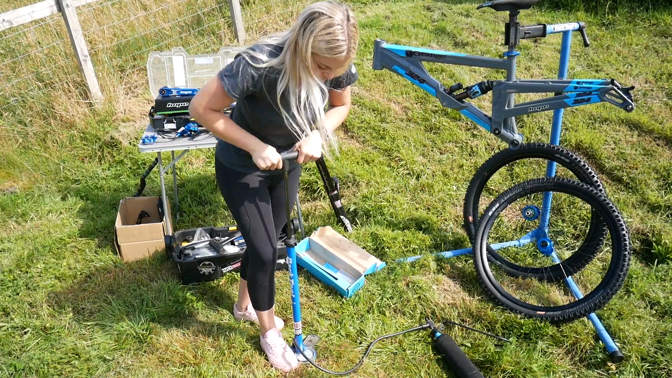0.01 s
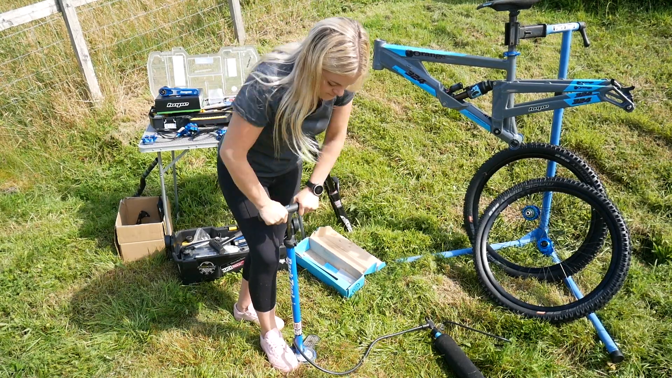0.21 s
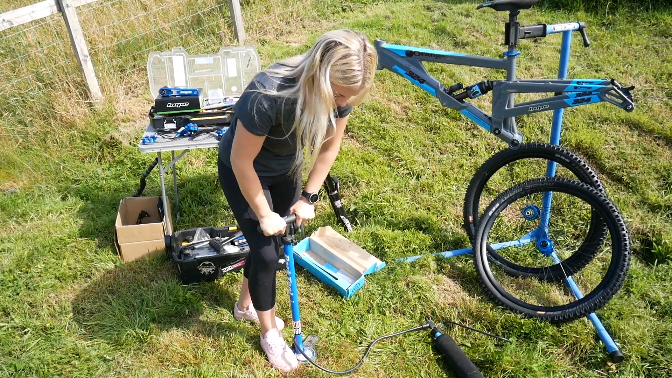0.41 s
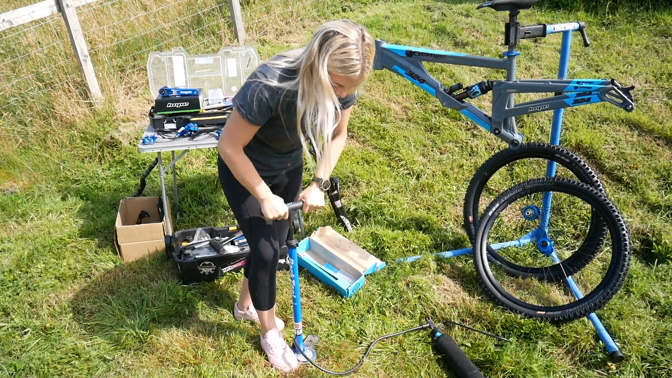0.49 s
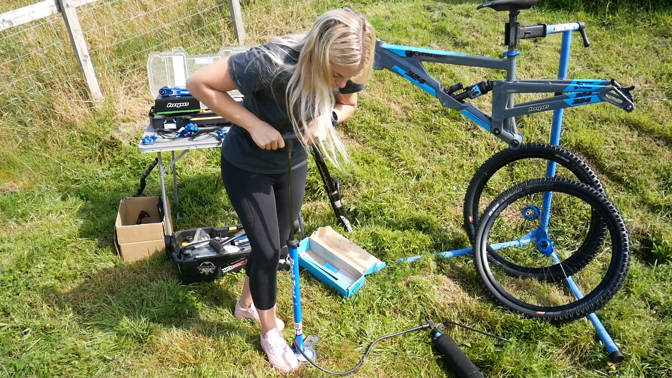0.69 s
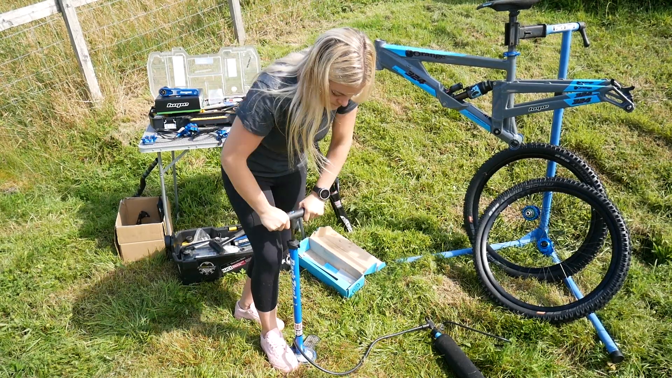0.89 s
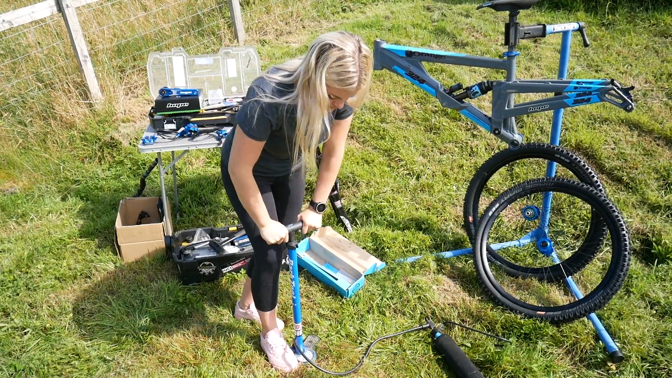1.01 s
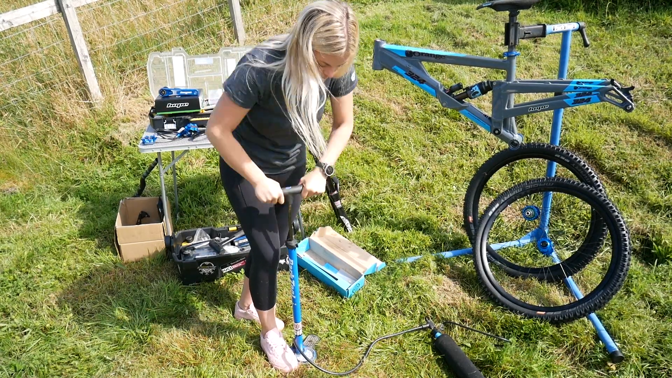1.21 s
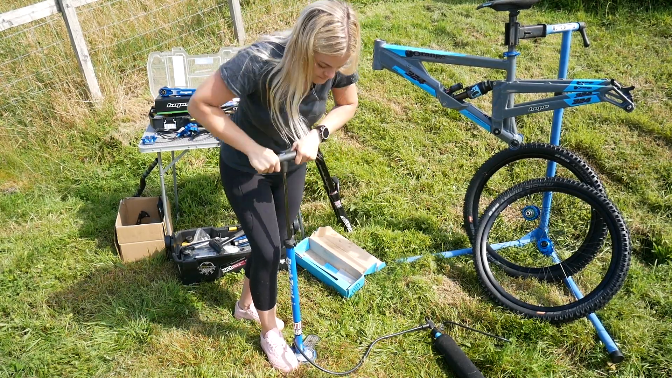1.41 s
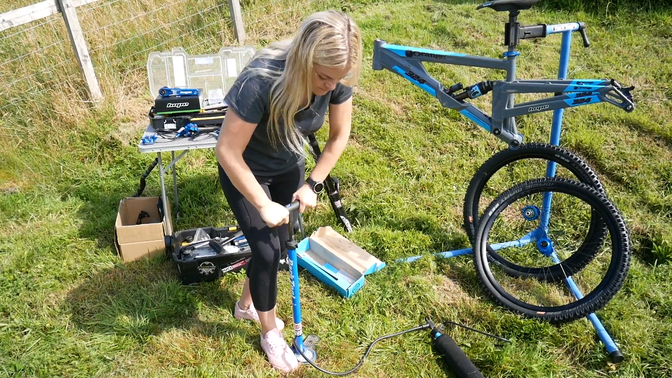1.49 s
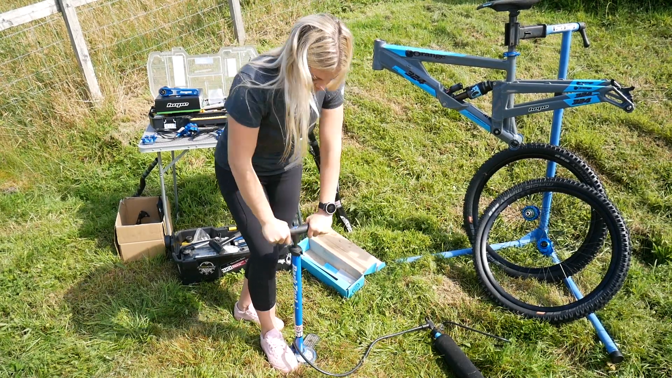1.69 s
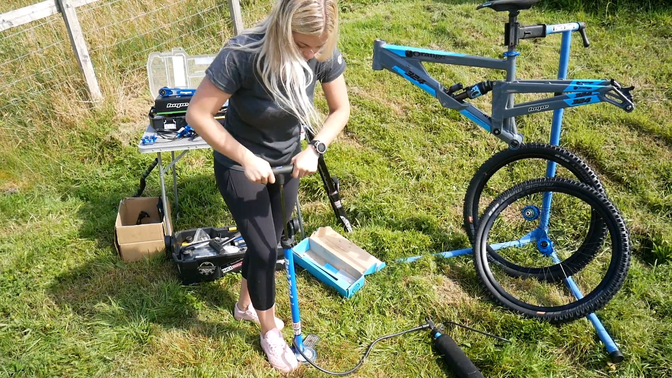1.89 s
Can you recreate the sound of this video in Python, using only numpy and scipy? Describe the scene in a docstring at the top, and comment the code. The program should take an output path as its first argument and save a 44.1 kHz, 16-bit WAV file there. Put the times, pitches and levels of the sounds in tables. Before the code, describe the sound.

A bicycle floor pump on grass, heard from a few steps away. A soft intake rush opens; pushes hiss from about 0.12, 0.76 and 1.4 seconds, ending in rough, falling-then-shrill squeaks near 0.25-0.38, 0.89-0.95 and 1.53-1.69. Dull valve pops come at 0.47 and 1.15, airy lifts around 0.6, 1.28 and 1.95. Faint open air, a low hum and very little echo.

```python
"""A soft rush of air into a barrel, then three quick pushes of a bicycle floor pump on a lawn, a few steps away.
Each push hisses (shaped noise) and its seal squeaks: two beating modes with locked overtones; pitch drops, chatters.
Bleeding air rings the hose; lifts draw air (noise swells, barrel resonances); two upward turns pop the valve.
A weak fence echo and short tail follow. Open air (wide noise) and a faint wavering hum (sine) lie beneath."""
import sys
import numpy as np
from scipy import signal
from scipy.fft import rfft, irfft, next_fast_len
from scipy.io import wavfile
from scipy.ndimage import uniform_filter1d, map_coordinates

SR = 44100
rng = np.random.default_rng(int(sys.argv[2]) if len(sys.argv) > 2 else 0)


def master_out(mix):
    """Clip the mix to full scale and print it as 16-bit PCM to the path in sys.argv[1]."""
    frames = np.transpose(np.atleast_2d(mix))
    ceiling = np.clip(frames, -1, 1)
    pcm = np.round(ceiling * 32767).astype(np.int16)
    wavfile.write(sys.argv[1], SR, pcm)


N = 85995

# Squeak track per push: t/s, pitch f/Hz, level/dB, octave level/dB, second mode re first/dB, its offset above pitch f/Hz
SQUEAKS = [
    [(.2435, 2618, -18.5, -63.5, -42, 800), (.246, 2066, -17.5, -41.5, -35, 816),
     (.252, 1946, -19, -24.5, -16, 804), (.260, 1890, -20.5, -38.5, -34, 500),
     (.268, 1990, -19, -30.5, -11.5, 433), (.277, 1887, -23.5, -36, -3, 450),
     (.284, 2077, -11.5, -56, -26, 450), (.292, 2153, -14, -37.5, -45, 450),
     (.318, 2076, -14.5, -40, -53, 450), (.351, 2135, -15, -47, -70.5, 427),
     (.364, 2065, -20, -44, -51.5, 450), (.372, 1915, -24, -54.5, -46, 448),
     (.383, 1777, -42.5, -66.5, -33, 452)],
    [(.889, 2492, -34, -57, -22.5, 500), (.893, 2034, -18.5, -58, -20, 500),
     (.900, 1852, -22.5, -39.5, -9, 484), (.919, 1998, -21.5, -36.5, -11, 426),
     (.924, 1835, -28, -42, -6.5, 331), (.928, 1824, -26, -30.5, -15, 330),
     (.936, 1882, -21.5, -34.5, 12, 290), (.940, 1894, -41, -45, -16, 302),
     (.948, 1900, -45, -51, -17, 300)],
    [(1.527, 2497, -27, -53, -35, 700), (1.532, 2212, -19, -45, -34, 693),
     (1.538, 1950, -18, -40.5, -21.5, 715), (1.546, 1922, -25, -39, -6, 854),
     (1.548, 1810, -29.5, -37.5, -7, 370), (1.562, 1770, -26, -38.5, 6, 388),
     (1.570, 2065, -20.5, -40.5, -21.5, 395), (1.581, 1991, -21.5, -34.5, -16, 404),
     (1.610, 1953, -21.5, -39, -56, 406), (1.628, 1992, -20, -41, -54, 408),
     (1.645, 2013, -22, -41.5, -67, 410), (1.662, 1947, -21, -46.5, -53, 410),
     (1.675, 1820, -43.5, -49.5, -29.5, 400), (1.688, 1816, -39, -65, -28, 400)],
]
# Overtones above the octave: multiple of pitch, level/dB before growth and chatter loss
OVERTONES = [(3, -49.5), (4, -44), (5, -52.5), (6, -53.5), (7, -62.5)]
# Every other slip a little stronger: multiple of pitch, level re octave/dB
SUBTONES = [(.5, -23.5), (1.5, -15), (2.5, -18), (3.5, -25.5), (5.5, -36.5)]
# Rubbing noise colour: f/Hz, relative level/dB
RASP = [(40, -45), (200, -16.5), (450, -12), (1200, -23), (1600, -19), (1900, -24), (2400, 2), (2800, -10),
        (3500, 6), (4800, -7), (5700, -12.5), (7800, 1.5), (10000, -22), (12000, -24.5), (15000, -30)]
# Squeak stereo balance: f/Hz, L-R level/dB
SQUEAK_BALANCE = [(1800, 1), (2000, .5), (2150, -.4), (4200, -.5), (6200, 0), (8300, 3), (10000, -2),
                  (14000, -7)]
# Squeak stereo phase: f/Hz, left lead/rad
SQUEAK_PHASE = [(2000, 0), (5200, .1), (6200, -1), (8300, -1.3), (12500, -.6)]
JITTER, CHATTER_JITTER, JITTER_RATE_HZ = .0025, .018, 700  # pitch scatter as fraction: steady, added by chatter
SLIP_SCATTER_RAD, SLIP_SCATTER_RATE_HZ = 0.11, 600
OCTAVE_BEAT_RAD = .45  # beating passed to the overtones in full chatter
SHIMMER_DB, OVERTONE_FLICKER_DB = .35, 3.5
LOCKED_DB, OVERTONE_GROWTH = -18.5, .3  # squeak level of zero overtone offset; dB per dB above it (1 below)
CHATTER_LOSS_DB = 4  # per multiple of pitch in full chatter
RASP_DB, RASP_CHATTER = -10, 1.0  # re octave; growth with chatter

# Pushes: start t/s, end t/s, hiss level/dB
PUSHES = [(0.124, 0.305, -44), (0.76, 0.923, -43.5), (1.402, 1.573, -44.5)]
# Valve hiss colour: f/Hz, relative level/dB
HISS = [(100, -23.5), (450, -7.5), (1000, -8), (1500, -1), (2300, -0.5), (3300, 1.5), (4800, -2.5),
        (6400, -0.5), (7500, 6), (8600, -1.5), (10500, -6), (11700, -7), (13000, -13), (15000, -20)]
# Likeness of left and right, shared by the pump noises: f/Hz, correlation/1
HISS_ALIKE = [(500, 1), (1500, 0.83), (3000, 1), (5500, .6), (7500, 0), (14000, 0)]
# Pump noise balance: f/Hz, L-R level/dB
HISS_BALANCE = [(1300, 2.5), (4400, -2), (8500, 1.5), (11000, -5), (14500, -10.5)]
# Hollow rush as a push starts: f/Hz, relative level/dB
GULP = [(150, -22), (600, -5), (850, -6.5), (1050, 1), (1500, -5), (2200, -4), (3300, -12), (5000, -27.5),
        (6500, -29), (7200, 1), (8000, -2), (12000, -18.5)]
# Top of the jet: f/Hz, relative level/dB
FIZZ = [(3000, -42), (7000, -11), (8400, -0.5), (10200, 0.5), (11700, 2), (13000, -7.5), (15000, -12)]
PUSH_ATTACK_S, PUSH_FALL_DB_PER_S = 0.07, 174.5
GULP_DELAY_S, GULP_SPREAD_S, GULP_DB = .058, 0.021, -2  # re hiss
FIZZ_DELAY_S, FIZZ_DB = 0.032, -7.5  # builds later, with the pressure; re hiss
HISS_PATCHY_DB, INTAKE_PATCHY_DB = 3.5, 4

# Air singing on in the hose: start t/s, end t/s, level/dB
BLEEDS = [(.34, .39, -57), (.935, 1.055, -54), (1.64, 1.69, -54)]
# Hose resonances: f/Hz, width/Hz, relative level/dB
HOSE = [(2186, 63, -4), (2666, 30, 2), (3220, 26, 7), (3790, 120, -7), (4385, 45, 2), (7200, 280, -6.5),
        (7900, 250, -17.5), (10240, 600, -13.5), (11290, 150, -11)]
BLEED_ATTACK_S, BLEED_FALL_DB_PER_S, HOSE_TOP_HZ = .02, 314, 11700

# Lifts: fastest moment t/s, spread/s, level/dB
LIFTS = [(0.023, 0.048, -52), (0.594, 0.075, -53), (1.282, 0.062, -53.5), (1.95, 0.12, -56.5)]
# Drawn air colour: f/Hz, relative level/dB
INTAKE = [(200, -34.5), (900, -7), (1600, -6.5), (2200, 0), (2900, -5), (4000, -10.5), (6500, -10),
          (7300, -9.5), (9000, -18.5), (12000, -20.5), (15000, -35.5)]
# Barrel resonances as air is drawn: f/Hz, width/Hz, relative level/dB
BARREL = [(1270, 100, -13), (2084, 89, -1.5), (2518, 78, 0.5)]
# Rod scuffs at the top turn: t/s, spread/s, level/dB
TOP_KNOCKS = [(.68, .008, -61), (1.793, 0.013, -59.5)]
BARREL_DB = 4  # re drawn air

# Valve pops as the handle turns upward: t/s, thump level/dB, tick level/dB (both before decay)
POPS = [(0.465, -28.5, -50.5), (1.148, -27.5, -46.5)]
# Tick colour: f/Hz, relative level/dB
TICK = [(40, -37), (300, 7), (1500, -18), (2800, -2), (3500, 9.5), (4300, -32.5), (12000, -37)]
POP_HZ, POP_ATTACK_S, POP_T60_S, TICK_T60_S = 327, 0.0059, 0.055, 0.066

# Colour of scattered sound, treble strongest: f/Hz, gain/dB
YARD_COLOUR = [(500, 2), (2200, 5), (3200, 10), (8000, 13), (14000, 10)]
ECHO_S, ECHO_SPREAD_S, ECHO_DB = 0.035, 0.015, -31  # level before YARD_COLOUR
YARD_T60_S, YARD_DB = .2, -31  # level before YARD_COLOUR

# Open air colour: f/Hz, relative level/dB
AIR = [(25, -35), (45, -25), (70, -16.5), (120, -5.5), (200, -1), (380, 0), (600, -6.5), (1000, -14),
       (1400, -16.5), (1950, -19.5), (2500, -20), (4400, -24), (5800, -32.5), (7400, -38), (9000, -32),
       (12000, -37), (15000, -38)]
# Likeness of left and right in the air: f/Hz, correlation/1
AIR_ALIKE = [(60, -0.2), (300, -0.72), (700, -0.7), (1500, -0.6), (3000, 1), (7000, 0.5), (14000, 0.4)]
# Air balance: f/Hz, L-R level/dB
AIR_BALANCE = [(100, -1), (700, -1.1), (2000, 0.5), (8000, 1), (14000, 0)]
AIR_DB = -51.5
HUM_HZ, HUM_DB, HUM_WAVER_DB = 227.2, -62, -0.5
TOP_HZ = 15350


def squeak(rows):
    """Stick-slip seal: a second mode beats with and roughens the first until slipping locks and turns shrill."""
    t = clock()
    s, *cols = np.transpose(rows)
    hz, db, octave_db, second_db, above_hz = [np.interp(t, s, c) for c in cols]
    fade_in = np.clip((t - s[0]) / 0.0026, 0, 1)
    fade_out = np.clip((s[-1] - t) / 0.0022 + 1, 0, 1)
    gate = fade_in * fade_out

    second = amp(second_db)
    chatter = np.sqrt(np.minimum(second, 1))
    jitter = (JITTER + CHATTER_JITTER * chatter) * wobble(JITTER_RATE_HZ)
    phase = 2 * np.pi * np.cumsum(hz * (1 + jitter)) / SR
    beat = 2 * np.pi * np.cumsum(above_hz * (1 + 0.15 * wobble(250))) / SR
    modes = (np.cos(phase) + second * np.cos(phase + beat)) / np.sqrt(1 + second ** 2)

    slip = phase + SLIP_SCATTER_RAD * wobble(SLIP_SCATTER_RATE_HZ)
    beat_shift = OCTAVE_BEAT_RAD * chatter * np.sin(beat)

    def partial(k, level_db):
        """Flickering multiple k of the slip phase."""
        return amp(level_db + OVERTONE_FLICKER_DB * wobble(130)) * np.cos(k * slip + beat_shift)

    def subtone(k, level_db):
        """Flickering half-multiple k of the pitch phase."""
        return amp(level_db + OVERTONE_FLICKER_DB * wobble(90)) * np.cos(k * phase + .5 * wobble(200))

    shrill_db = np.minimum(db - LOCKED_DB, OVERTONE_GROWTH * (db - LOCKED_DB))
    upper = partial(2.001, octave_db)
    for k, level_db in OVERTONES:
        upper = upper + partial(k, level_db + shrill_db - CHATTER_LOSS_DB * k * chatter)
    halves = sum(subtone(k, level_db) for k, level_db in SUBTONES)

    shimmering = amp(db + SHIMMER_DB * wobble(150)) * modes
    tone = np.sqrt(2) * (shimmering + upper + amp(octave_db) * halves)
    rasp_level = amp(octave_db + RASP_DB) * (1 + RASP_CHATTER * chatter)
    rasp = rasp_level * rush(RASP, HISS_ALIKE, HISS_BALANCE)
    return panned(gate * tone, SQUEAK_BALANCE, SQUEAK_PHASE) + gate * rasp


def valve_hiss():
    """Air forced through the valve on the way down: hollow at first, then brighter."""
    flow = held(PUSHES, PUSH_ATTACK_S, PUSH_FALL_DB_PER_S) * amp(0.68 * wobble(46))
    gulps = swells([(start + GULP_DELAY_S, GULP_SPREAD_S, db + GULP_DB) for start, _, db in PUSHES])
    fizz_rows = [(start + FIZZ_DELAY_S, end, db + FIZZ_DB) for start, end, db in PUSHES]
    fizz = held(fizz_rows, PUSH_ATTACK_S, 2 * PUSH_FALL_DB_PER_S)
    out = np.zeros((2, N))
    for level, colour in [(flow, HISS), (gulps, GULP), (fizz, FIZZ)]:
        out += level * patchy(rush(colour, HISS_ALIKE, HISS_BALANCE), HISS_PATCHY_DB)
    return out


def hose():
    """The last of the air rings the hose's resonances."""
    colour = lambda hz: resonances(HOSE)(hz) / (1 + (hz / HOSE_TOP_HZ) ** 20)
    return held(BLEEDS, BLEED_ATTACK_S, BLEED_FALL_DB_PER_S) * rush(colour, HISS_ALIKE, HISS_BALANCE)


def intake():
    """The rising piston rubs along the barrel, which sings when the lift is fastest; the rod scuffs at the top."""
    draw = swells(LIFTS) * patchy(rush(INTAKE, HISS_ALIKE, HISS_BALANCE), INTAKE_PATCHY_DB)
    sing_level = swells([(s, spread * 0.32, db + BARREL_DB) for s, spread, db in LIFTS])
    sing = sing_level * rush(resonances(BARREL), HISS_ALIKE, HISS_BALANCE)
    scuffs = swells(TOP_KNOCKS) * rush(HISS, HISS_ALIKE, HISS_BALANCE)
    return (draw + sing) * amp(0.83 * wobble(70)) + scuffs


def valve_pops():
    """The check valve ticks and the air in the barrel rings briefly."""
    out = np.zeros((2, N))
    for s, thump_db, tick_db in POPS:
        t = np.maximum(clock() - s, 0)
        attack = 1 - np.exp(-(t / POP_ATTACK_S) ** 2)
        out += amp(thump_db - 60 * t / POP_T60_S) * attack * np.sin(2 * np.pi * POP_HZ * t)
        tick_level = (t > 0) * amp(tick_db - 60 * t / TICK_T60_S)
        out += tick_level * rush(TICK, HISS_ALIKE, HISS_BALANCE)
    return out


def yard(x):
    """Convolution with noise: a weak scattered fence echo and a short tail from things on the lawn."""
    t = np.arange(SR // 3) / SR
    echo = np.exp(-.5 * ((t - ECHO_S) / ECHO_SPREAD_S) ** 2)
    decay = amp(-60 * t / YARD_T60_S)
    tail = 0
    for db, shape in [(ECHO_DB, echo), (YARD_DB, decay)]:
        # common noise plus half as much private to each channel
        noise = rng.standard_normal(len(t)) + .5 * rng.standard_normal((2, len(t)))
        tail = tail + amp(db) * shape / np.linalg.norm(shape) * noise
    scattered = signal.fftconvolve(x, tail, axes=1)[:, :N]
    return filtered(scattered, lambda hz: amp(along(YARD_COLOUR, hz)))


def outdoors():
    """Open air as wide noise, and a distant hum whose level and phase waver."""
    phase = 2 * np.pi * HUM_HZ * clock() + 0.33 * wobble(17)
    channel = lambda: amp(HUM_DB + HUM_WAVER_DB * wobble(7)) * np.sin(phase + 0.54 * wobble(11))
    hum = np.sqrt(2) * np.array([channel(), channel()])
    air = amp(AIR_DB + .7 * wobble(3.3)) * rush(AIR, AIR_ALIKE, AIR_BALANCE)
    return hum + air


def rush(colour, alike, balance):
    """Stereo noise of rms 1; colour is (f/Hz, level/dB) points or a response."""
    gain = colour if callable(colour) else lambda hz: amp(along(colour, hz))

    def mid_side(hz):
        """Mid and side gains that give the wanted likeness."""
        turn = np.arccos(np.clip(along(alike, hz), -.98, .98)) / 2
        return gain(hz) * np.array([np.cos(turn), np.sin(turn)])

    mid, side = filtered(rng.standard_normal((2, N)), mid_side)
    return unit(panned(np.array([mid + side, mid - side]), balance))


def patchy(x, depth_db):
    """Turbulence: the colour of a noise shifts in random time-frequency patches."""
    z = signal.stft(x, nperseg=512)[2]
    field = rng.standard_normal(z.shape[1:])
    field = uniform_filter1d(uniform_filter1d(field, size=4, axis=0), size=6, axis=1)
    return unit(signal.istft(z * amp(depth_db * unit(field)), nperseg=512)[1][:, :N])


def resonances(rows):
    """Summed band-pass response of (f/Hz, width/Hz, level/dB) rows."""
    return lambda f: sum(amp(db) * 1j * f * w / (c * c - f * f + 1j * f * w) for c, w, db in rows)


def held(rows, attack_s, fall_db_per_s):
    """Attack, hold and release for each (start/s, end/s, level/dB) row."""
    t = clock()
    level = 0
    for start, end, db in rows:
        attack = np.clip((t - start) / attack_s, 0, 1)
        level = level + attack * amp(db - fall_db_per_s * np.maximum(t - end, 0))
    return level


def swells(rows):
    """A Gaussian swell for each (centre/s, spread/s, level/dB) row."""
    return sum(amp(db) * np.exp(-.5 * ((clock() - s) / spread) ** 2) for s, spread, db in rows)


def panned(x, balance, phase=((1, 0),)):
    """Level and phase differences between left and right."""
    side = np.array([[.5], [-.5]])
    return filtered(x, lambda hz: amp(side * along(balance, hz)) * np.exp(1j * side * along(phase, hz)))


def filtered(x, response):
    """x shaped by a response of frequency, via a padded FFT."""
    m = next_fast_len(N + SR // 2)
    return irfft(rfft(x, m) * response(np.fft.rfftfreq(m, 1 / SR)), m)[..., :N]


def wobble(rate_hz):
    """Smooth random curve, rate_hz knots a second."""
    return map_coordinates(rng.standard_normal(N // 8), [clock() * rate_hz], mode="wrap")


def along(points, hz):
    """(f/Hz, value) points interpolated on a log frequency axis."""
    f, v = np.transpose(points)
    return np.interp(np.log(hz + 1), np.log(f + 1), v)


def amp(db):
    """Decibels to gain."""
    return 10 ** (np.asarray(db) / 20)


def unit(x):
    """Scaled to rms 1."""
    return x / np.sqrt(np.mean(x ** 2) + 1e-20)


def clock():
    """Time of each sample in s."""
    return np.arange(N) / SR


def scene():
    """The pump, its scattered echo and the open air."""
    pump = sum(squeak(rows) for rows in SQUEAKS) + valve_hiss() + hose() + intake() + valve_pops()
    return pump + yard(pump) + outdoors()


def record(dry):
    """Band limit: nothing passes from TOP_HZ up."""
    return filtered(dry, lambda hz: hz < TOP_HZ)


dry = scene()
out = record(dry)
master_out(out)
```